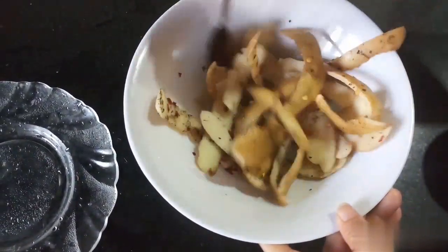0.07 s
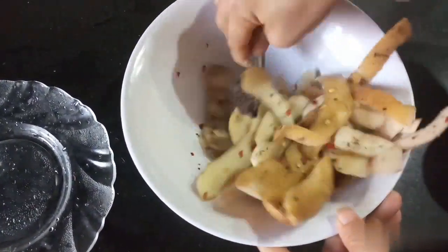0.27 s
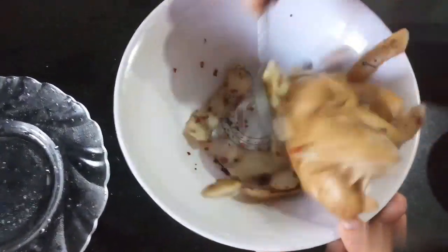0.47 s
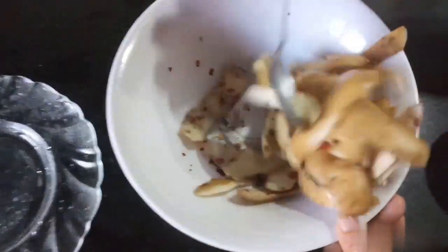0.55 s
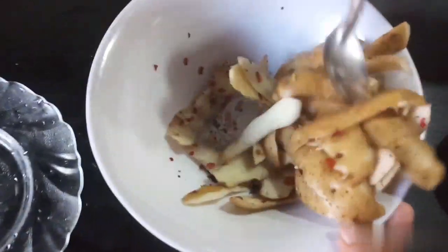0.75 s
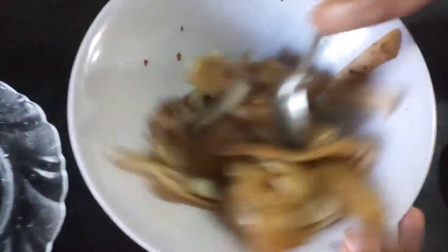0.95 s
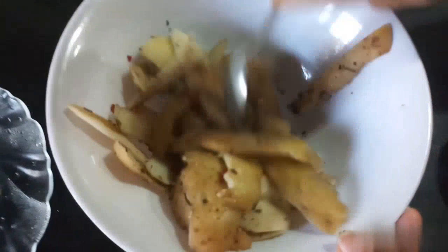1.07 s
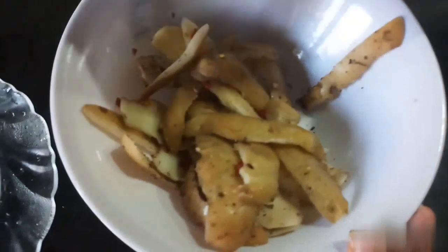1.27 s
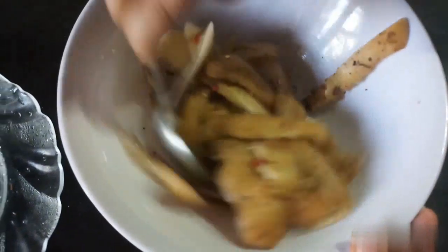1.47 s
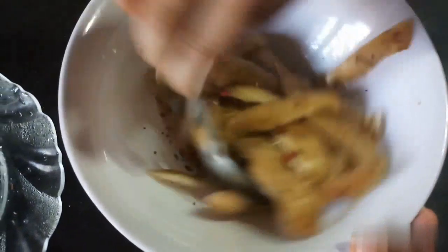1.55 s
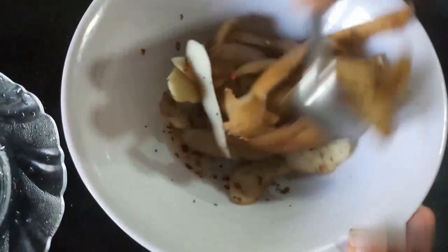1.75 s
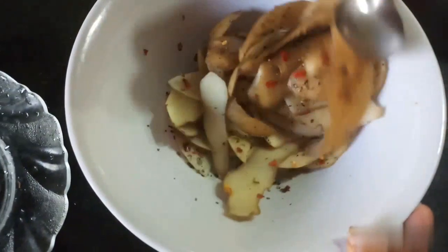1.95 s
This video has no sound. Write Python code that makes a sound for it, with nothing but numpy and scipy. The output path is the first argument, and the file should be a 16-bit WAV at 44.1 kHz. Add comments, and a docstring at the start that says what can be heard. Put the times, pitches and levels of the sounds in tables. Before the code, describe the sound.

Spoon clinking in a ceramic bowl: one sharp hit, a wet rustle, then fainter taps and scrapes

```python
"""Hard-walled kitchen, close by: a steel spoon tosses moist peel in a ceramic bowl.
One loud strike rings the bowl's modes over a noisy crack; fainter clinks and spoon taps follow.
Strokes rustle as showers of random grains; squeaks are pairs of wavering, sagging sines.
Behind: coloured room noise, uneven low rumble, a low hum that comes and goes, faint mains buzz."""
import sys
import numpy as np
from scipy import signal
from scipy.fft import rfft, irfft, next_fast_len
from scipy.io import wavfile
from scipy.ndimage import uniform_filter1d, map_coordinates

SR = 44100
rng = np.random.default_rng(int(sys.argv[2]) if len(sys.argv) > 2 else 0)


def generate_wav(sig):
    """Save sig (samples, or channels by samples) to the path in sys.argv[1] as 16-bit PCM at SR."""
    pcm = np.round(np.clip(np.atleast_2d(sig).T, -1, 1) * 32767).astype(np.int16)
    wavfile.write(sys.argv[1], SR, pcm)


N = 88200  # samples

# room noise spectrum: freq_hz, level_db
AIR_SPECTRUM = [(18, -55.5), (30, -26.5), (81, 0.5), (119, -7.5), (143, -9), (304, -12.5), (567, -14),
                (612, -8.5), (754, -15.5), (1240, -13.5), (2430, -23), (8250, -24.5), (15000, -70.5)]
AIR_LEVEL_DB = -60.5
# rumble spectrum: freq_hz, level_db
RUMBLE_SPECTRUM = [(25, -10.5), (50, -4), (130, -3.5), (350, -3), (600, -10), (1400, -17), (2500, -29),
                   (6000, -50)]
# rumble level over time: time_s, level_db
RUMBLE_LEVEL = [(0, -61.5), (.15, -55), (.6, -61), (1.0, -62.5), (1.2, -63.5), (1.35, -61.5), (1.47, -56),
                (1.62, -54), (1.85, -52), (2, -51)]
# hum level over time, before HUM_TRIM_DB: time_s, level_db
HUM_LEVEL = [(0.0, -64.5), (0.1, -44), (0.26, -42.5), (0.62, -64), (0.66, -74), (0.72, -57.5), (0.92, -70),
             (0.98, -92.5), (1.05, -91), (1.64, -74), (1.7, -44.5), (1.84, -54), (1.87, -55), (2.0, -71)]
HUM_HZ, HUM_TRIM_DB = 74, -1
# mains harmonics: multiple, mean_level_db
MAINS_HARMONICS = [(1, -74.5), (2, -71.5), (3, -65), (4, -71), (5, -75.5), (6, -69), (7, -74), (8, -75.5)]
MAINS_HZ = 48.8

# kitchen decay: freq_hz, t60_s
KITCHEN_DECAY = [(200, 0.24), (1300, .58), (3700, 0.49), (9700, 0.4)]
# colour of the kitchen's answer to the bowl: freq_hz, level_db
WALL_SPECTRUM = [(88, -46), (150, -17.5), (265, -6.5), (373, -5), (434, -3), (525, -12), (782, -0.5),
                 (1020, -1), (1360, -3.5), (1740, -24), (2060, -10), (2310, -17.5), (2630, -4), (2950, -11),
                 (3570, -12.5), (3850, -8), (4930, -8), (6070, 2), (6680, -8.5), (8710, -3), (9760, -15.5),
                 (11100, -6.5), (14000, -29.5)]
TAIL_DB, ECHO_DB, TAIL_RISE_S = -7, -8, 0.0021

# modes of the ceramic bowl: freq_hz
BOWL_HZ = [685, 795, 955, 1060, 1215, 2444, 2640, 3952, 4312, 5561, 5935, 6075, 6243, 6975, 7420, 8781]
# ring of each bowl mode, same order, at damping 1: level_db, t60_s
BOWL_RING = [(-8, 0.063), (-5, 0.1), (-3.5, 0.068), (-6, 0.044), (-7.5, 0.035), (-10.5, .07), (-7, 0.077),
             (-11.5, .1), (-7.5, 0.048), (-4.5, .055), (-2.5, .055), (1.5, 0.031), (-3.5, .07), (-7, 0.05),
             (-1.5, 0.057), (-10, 0.15)]

# spoon strokes through the food: start_s, length_s, level_db, rise_s, fall_s (per 20 dB),
# brightness_db_per_octave
STROKES = [(-.03, 0.036, -49.5, .02, 0.1, -4), (.31, .04, -37, .03, 0.065, 0.5),
           (0.413, 0.047, -45, 0.017, 0.07, 1), (0.577, 0.036, -58.5, 0.0211, 0.053, -0.5),
           (0.903, 0.049, -68, 0.024, 0.03, 8), (1.044, 0.021, -53, 0.011, 0.067, 1),
           (1.093, 0.084, -51.5, .025, 0.23, 1), (1.223, 0.045, -45.5, 0.047, 0.034, 2.5),
           (1.596, 0.031, -55, 0.017, .04, 1.5), (1.646, 0.066, -46, .03, 0.026, 4),
           (1.722, 0.12, -53, 0.013, 0.2, -1), (1.913, 0.11, -55.5, 0.034, 0.11, 0)]
# scrape spectrum: freq_hz, level_db
SCRAPE_SPECTRUM = [(290, -47), (500, -21), (734, -6), (788, -7.5), (990, -4), (1350, -4.5), (2330, -12.5),
                   (2570, -11), (3610, -11.5), (3990, -4), (6570, -9), (8370, -6), (9650, -17.5),
                   (14200, -26.5), (15000, -42)]
GRAINS_PER_S, GRAIN_SPREAD_DB, SMOOTH_DB = 2200, 2, -2
SCRAPE_RING_DB, SCRAPE_ROOM_DB, PATCHY_DB = -20, -7, 2.5

# steel slipping on glaze: middle_s, half_length_s, pitch_hz, level_db, second_pitch_hz, second_level_db
# (pitches at the middle, levels before the roughness)
SQUEAKS = [(0.157, 0.17, 3800, -66.5, 7800, -70), (1.564, 0.033, 2570, -56, 3330, -62),
           (1.68, 0.032, 2517, -53.5, 4096, -50), (1.8, 0.12, 2598, -64, 4010, -61)]
SQUEAK_WAVER = 0.024  # share of pitch
SQUEAK_SAG_PER_S = 0.3  # share of the middle pitch
SQUEAK_ROUGHNESS_DB, SQUEAK_ROOM_DB = 1.8, -1

# light spoon taps: time_s, ring_db, tick_db
SPOON_TAPS = [(.8143, -69, -58), (0.9972, -77.5, -62), (1.0176, -66, -57.5), (1.039, -62, -39),
              (1.053, -67, -50), (1.5035, -72, -56), (1.790, -41.5, -36.5), (1.7942, -43, -50)]
# the spoon's own short ring: freq_hz, level_db, t60_s
SPOON_MODES = [(3322, -0.5, 0.034), (4700, -11, 0.022), (5600, -7, 0.053), (5480, 6.5, 0.024),
               (5936, 1.5, 0.037), (7150, -1, 0.031)]
# tick spectrum: freq_hz, level_db
TICK_SPECTRUM = [(200, -26.5), (900, -7), (1500, -6.5), (2200, -11), (3400, -17), (4700, 0), (8300, 0.5),
                 (9800, -17), (12500, -12.5), (15500, -25.5)]
TICK_T60_S, TAP_ROOM_DB = 0.033, -11.5

# spoon on bowl: time_s, level_db, bass_db, middle_db, treble_db, damping_factor, room_db
CLINKS = [(0.2068, -12.5, -3.5, 4.5, 2.5, 1.09, -5), (0.21, -25.5, 8.5, 8.5, -8, 1.3, -3),
          (0.6496, -57, 8.5, -8.5, -7, 0.95, 1.5), (1.291, -57.5, 12, -6, 2, 1.2, -6),
          (1.614, -53.5, 12, -14, -4, 1.54, -11), (1.6217, -53.5, -9, 7, 3.5, 0.69, -17),
          (1.6724, -44.5, 17.5, -3, -6, 1.86, -5), (1.678, -48, 10, 0, 6, 1.4, -10),
          (1.685, -50, 4, 0, 5, 1.8, -6), (1.982, -47.5, -2, 6.5, -3.5, 2.1, -9)]
# contact noise spectrum: freq_hz, level_db
CRACK_SPECTRUM = [(25, -27), (70, -10.5), (200, 2), (350, -16.5), (440, -7), (500, -18), (700, -9),
                  (1100, -1), (1450, -8), (1800, -23), (2200, -27.5), (2600, -8.5), (3300, -14),
                  (4100, -12.5), (5000, -10), (6100, -3), (7600, -9.5), (9000, -10), (9800, -26),
                  (11200, -22), (15000, -34.5)]
CRACK_DB, CRACK_T60_S, ATTACK_S = 7, 0.033, 0.0012  # t60 at damping 1

# microphone colour: freq_hz, gain_db
MIC_RESPONSE = [(60, 0), (350, 0), (500, -1.5), (650, 0.5), (1400, -0.5), (1800, -0.5), (2250, -1),
                (2600, -0.5), (3100, 1), (9000, 0), (9850, -5.5), (10700, -1.5), (13000, -1.5),
                (15900, -2.5)]
CLIP_TOP, TOP_HZ = 0.85, 15940  # full scale = 1


def amp(db):
    """Decibels to gain."""
    return 10 ** (np.asarray(db) / 20)


def unit(x):
    """Scale to rms 1."""
    return x / np.sqrt(np.mean(x ** 2) + 1e-20)


def along(points, hz):
    """Interpolate (freq_hz, value) points on a log-frequency axis."""
    f, v = np.transpose(points)
    return np.interp(np.log(hz + 1), np.log(f + 1), v)


def clock():
    """Time of every sample, s."""
    return np.arange(N) / SR


def curve(rows):
    """(time_s, value) rows joined by lines."""
    return np.interp(clock(), *np.transpose(rows))


def wobble(knots_per_s):
    """Smooth random curve: a spline through normal draws."""
    knots = rng.standard_normal(N // 8)
    return map_coordinates(knots, [clock() * knots_per_s + 2], mode="wrap")


def swell(middle_s, half_s):
    """Soft rise and fall around a moment."""
    return np.cos(np.pi / 2 * np.clip((clock() - middle_s) / half_s, -1, 1)) ** 0.84


def filtered(x, response):
    """x times a response of frequency, zero-padded."""
    m = next_fast_len(N + SR // 2)
    return irfft(rfft(x, m) * response(np.fft.rfftfreq(m, 1 / SR)), m)[:N]


def noise(spectrum):
    """Coloured noise of rms 1."""
    return unit(filtered(rng.standard_normal(N), lambda hz: amp(along(spectrum, hz))))


def add(out, x, time_s):
    """Mix x in from time_s."""
    i = max(0, round(time_s * SR))
    out[i:] += x[:N - i]


def fading(x):
    """Decay each frequency of x at the kitchen's rate, after a short rise."""
    hz, t, z = signal.stft(x, SR, nperseg=256)
    decay = amp(-60 * t / along(KITCHEN_DECAY, hz)[:, None])
    tail = signal.istft(z * decay, SR, nperseg=256)[1][:N]
    return tail * (1 - np.exp(-clock() / TAIL_RISE_S))


def kitchen(x):
    """Reverberation: convolve with a decaying-noise response of unit energy."""
    tail = fading(rng.standard_normal(N))
    return signal.fftconvolve(x, tail / np.linalg.norm(tail))[:N]


def patchy(x):
    """Random gain patches, smooth in time and frequency."""
    z = signal.stft(x, nperseg=512)[2]
    field = uniform_filter1d(rng.standard_normal(z.shape), size=7, axis=0)
    field = uniform_filter1d(field, size=7, axis=1)
    return signal.istft(z * amp(PATCHY_DB * unit(field)), nperseg=512)[1][:N]


def ringing(modes, damping):
    """Decaying sines, levels and phases a little different at each contact."""
    t = clock()[:SR // 4]
    ring = np.zeros(len(t))
    for hz, db, t60_s in modes:
        envelope = amp(db + rng.normal(0, 1) - 60 * t * damping / t60_s)
        ring += envelope * np.sin(2 * np.pi * (hz * t + rng.random()))
    return np.pad(ring, (0, N - len(t)))


def background():
    """Room noise and rumble are coloured noise; hum and mains buzz are unsteady sines."""
    t = clock()
    air = amp(AIR_LEVEL_DB) * noise(AIR_SPECTRUM)
    rumble = amp(curve(RUMBLE_LEVEL) + 1.2 * wobble(23)) * noise(RUMBLE_SPECTRUM)
    hum = amp(curve(HUM_LEVEL) + HUM_TRIM_DB) * np.sin(2 * np.pi * HUM_HZ * t + 0.25 * wobble(3.3))
    buzz = np.zeros(N)
    for k, db in MAINS_HARMONICS:
        buzz += amp(db + 3 * wobble(17)) * np.sin(2 * np.pi * k * MAINS_HZ * t + 0.6 * wobble(7))
    return air + rumble + hum + buzz


def bowl_response(hz):
    """Sum of the bowl's damped resonances, all driven equally."""
    total = 0
    for mode_hz, (_, t60_s) in zip(BOWL_HZ, BOWL_RING):
        width_hz = np.log(1000) / np.pi / t60_s
        total = total + 1j * hz / (mode_hz ** 2 - hz ** 2 + 1j * hz * width_hz)
    return total


def stirring():
    """Tiny slips and wet crackles swell with each stroke and stir the bowl's modes."""
    t, dry = clock(), np.zeros(N)
    hits = rng.random(N) < GRAINS_PER_S / SR
    slips = hits * rng.choice([-1, 1], N) * amp(GRAIN_SPREAD_DB * rng.standard_normal(N))
    grains = unit(slips) + amp(SMOOTH_DB) * rng.standard_normal(N)
    rub = unit(filtered(grains, lambda hz: amp(along(SCRAPE_SPECTRUM, hz))))
    texture = patchy(rub + amp(SCRAPE_RING_DB) * unit(filtered(rub, bowl_response)))
    for start_s, length_s, db, rise_s, fall_s, bright_db in STROKES:
        rise = np.clip((t - start_s) / rise_s, 0, 1)
        fall_db = 20 * np.maximum(t - start_s - length_s, 0) / fall_s
        stroke = unit(filtered(texture, lambda hz: amp(bright_db * np.log2(hz + 500))))
        dry += rise * amp(db - fall_db) * stroke
    return dry + amp(SCRAPE_ROOM_DB) * kitchen(dry)


def squeaks():
    """The spoon's edge sings briefly on the glaze with two rough, sagging tones."""
    out = np.zeros(N)
    for middle_s, half_s, hz, db, second_hz, second_db in SQUEAKS:
        pitch = 1 - SQUEAK_SAG_PER_S * (clock() - middle_s) + SQUEAK_WAVER * wobble(500)
        phase = 2 * np.pi * np.cumsum(pitch) / SR  # per Hz
        tones = amp(db) * np.sin(hz * phase) + amp(second_db) * np.sin(second_hz * phase)
        out += swell(middle_s, half_s) * amp(SQUEAK_ROUGHNESS_DB * wobble(120)) * tones
    return out + amp(SQUEAK_ROOM_DB) * kitchen(out)


def taps():
    """Light touches: a decaying noise tick and the spoon's own ring only."""
    out = np.zeros(N)
    for time_s, ring_db, tick_db in SPOON_TAPS:
        ring = amp(ring_db) * ringing(SPOON_MODES, 1)
        tick = amp(tick_db - 60 * clock() / TICK_T60_S) * noise(TICK_SPECTRUM)
        add(out, ring + tick, time_s)
    return out + amp(TAP_ROOM_DB) * kitchen(out)


def clinks():
    """Each contact cracks and rings the food-damped bowl; the room carries it on."""
    out, t = np.zeros(N), clock()
    attack = 1 - np.exp(-t / ATTACK_S)
    for time_s, db, bass_db, middle_db, treble_db, damping, room_db in CLINKS:
        colour = [(300, 0.00033), (700, bass_db), (1000, bass_db),
                  (1500, middle_db), (2600, middle_db), (6500, treble_db)]  # freq_hz, gain_db
        tone = lambda hz: amp(along(colour, hz))
        modes = [(hz, mode_db + along(colour, hz), t60_s)
                 for hz, (mode_db, t60_s) in zip(BOWL_HZ, BOWL_RING)]
        ring = ringing(modes, damping)
        crack = amp(CRACK_DB - 60 * t * damping / CRACK_T60_S) * filtered(noise(CRACK_SPECTRUM), tone)
        tail = amp(TAIL_DB) * fading(filtered(noise(WALL_SPECTRUM), tone))
        room = tail + amp(ECHO_DB) * kitchen(ring)
        add(out, amp(db) * ((ring + crack) * attack + amp(room_db) * room), time_s)
    return out


def scene():
    """Sum all sources at one close microphone."""
    return (background() + stirring() + squeaks() + taps() + clinks())[None]


def causal(gain):
    """Minimum-phase response with this gain, by folding the cepstrum."""
    c = irfft(np.log(gain))
    half = len(c) // 2
    return np.exp(rfft(np.concatenate([c[:1], 2 * c[1:half], np.zeros(half)])))


def record(dry):
    """Soft saturation towards CLIP_TOP, then microphone colour and a sharp cut at TOP_HZ."""
    x = dry[0] / (1 + (dry[0] / CLIP_TOP) ** 4) ** (1 / 4)
    return filtered(x, lambda hz: causal(amp(along(MIC_RESPONSE, hz))) * (hz < TOP_HZ))[None]


dry = scene()
out = record(dry)
generate_wav(out)
```